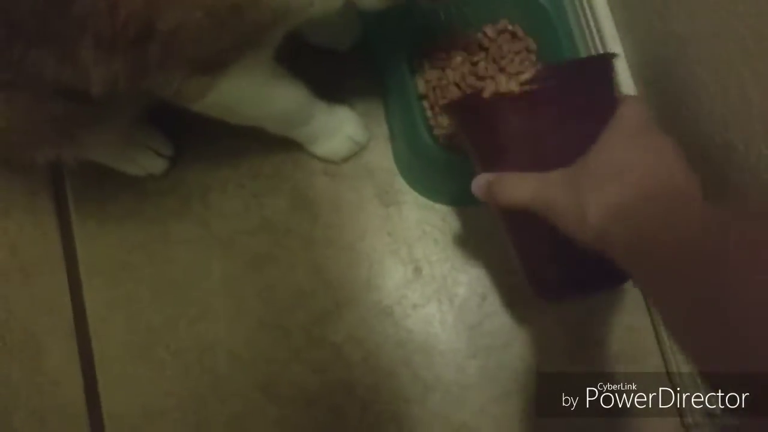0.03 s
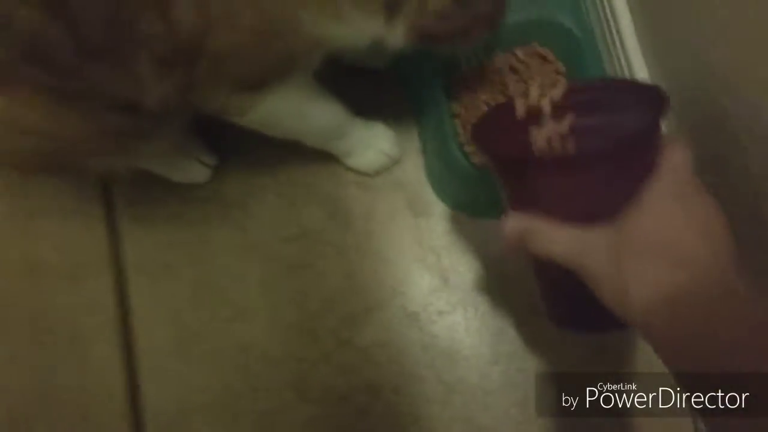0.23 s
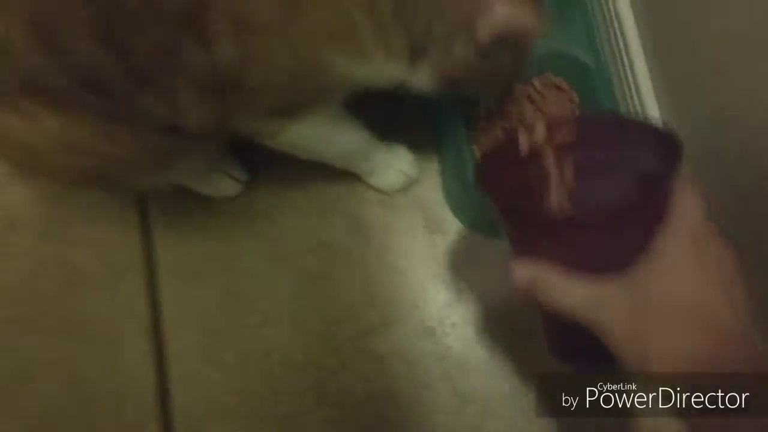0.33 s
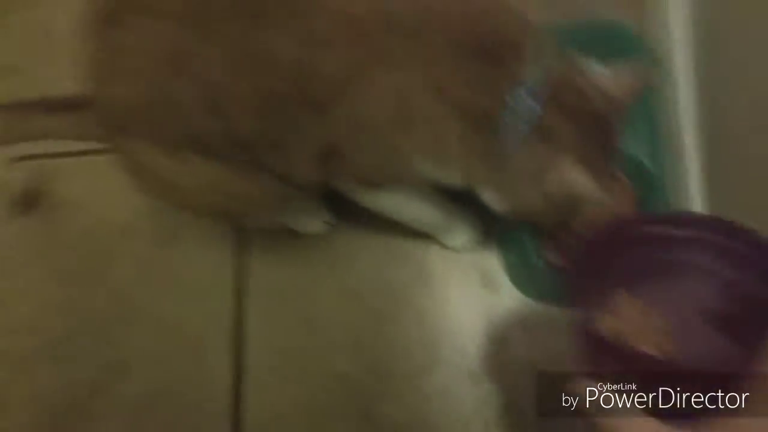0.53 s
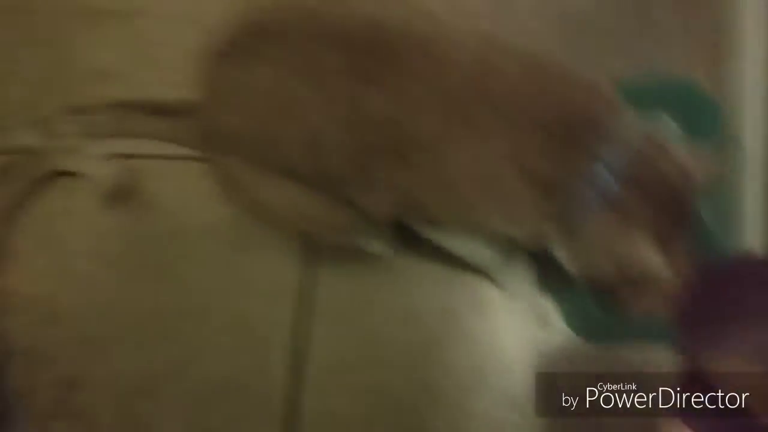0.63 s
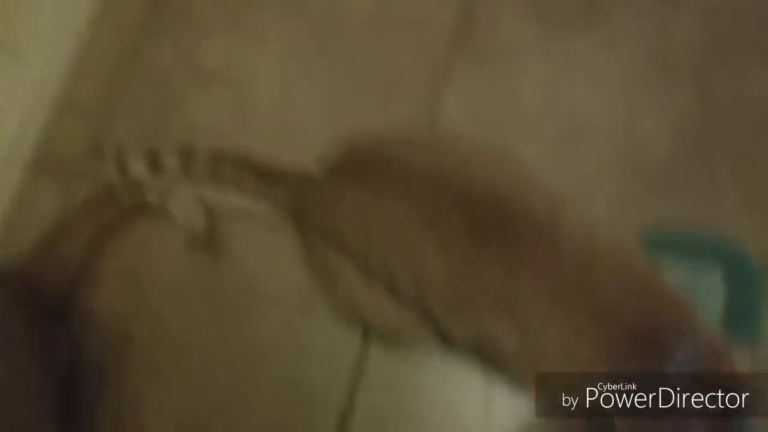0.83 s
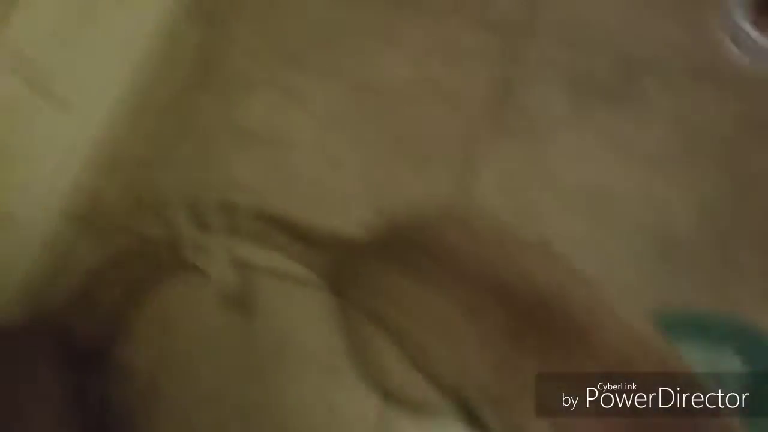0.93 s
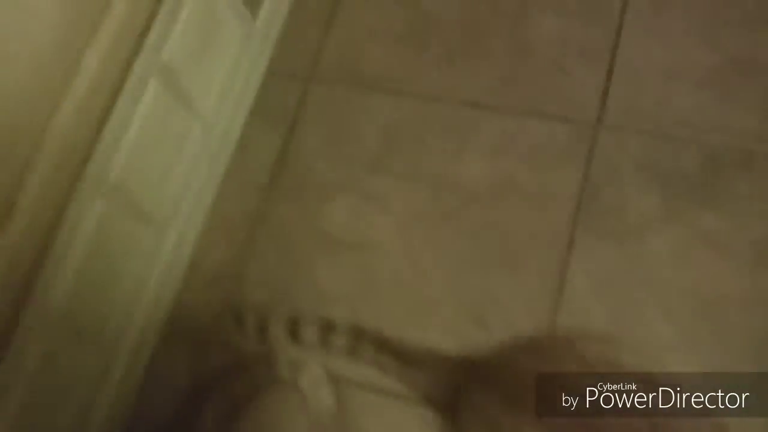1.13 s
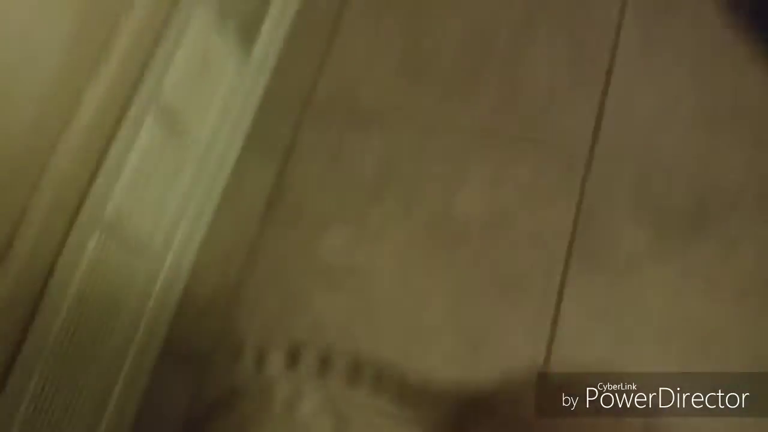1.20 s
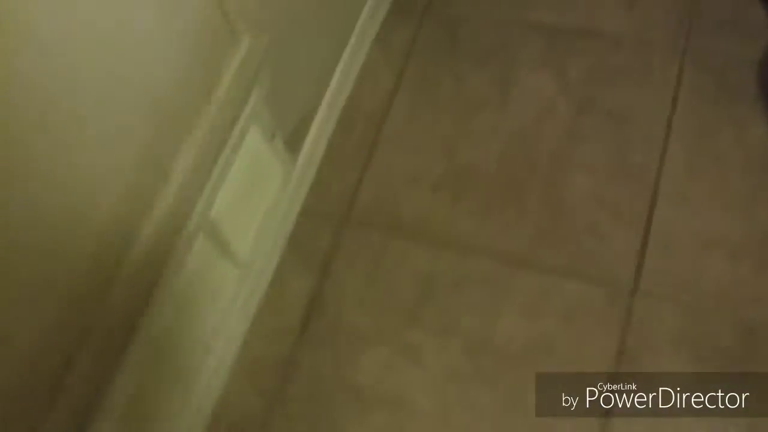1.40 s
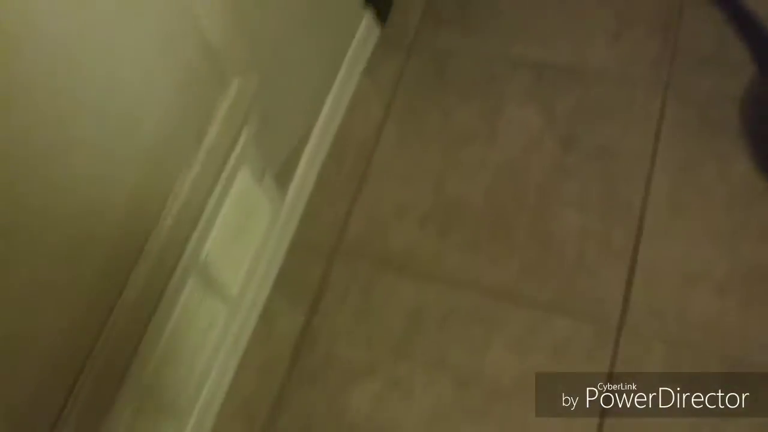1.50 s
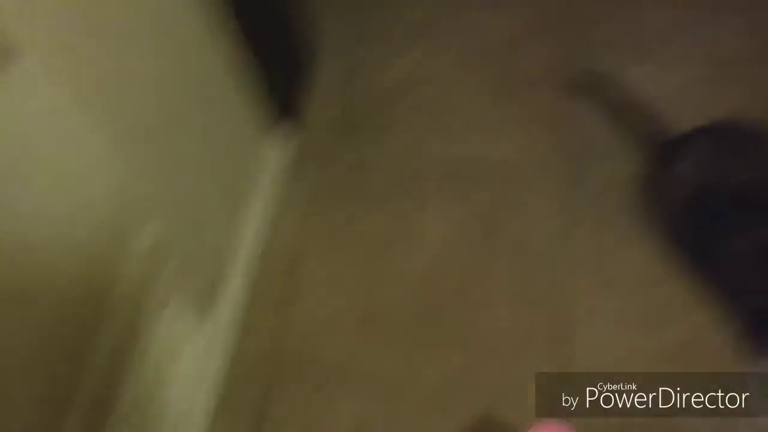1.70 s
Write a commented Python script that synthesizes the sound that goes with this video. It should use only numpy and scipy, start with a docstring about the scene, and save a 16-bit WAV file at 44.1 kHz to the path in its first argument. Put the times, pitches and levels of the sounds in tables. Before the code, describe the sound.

Dry kibble rattles in a plastic cup, with light knocks growing into sharp clacks, then a short metallic clink and a gritty foot scuff on tile. Close small microphone, short bright room echo, faint background noise.

```python
"""Pellets tumbling in a plastic cup

Dry pellets slide and tumble inside a plastic cup after pouring, in a small tiled room.
Each knock is a click that rings the cup's hollow, its wall and the pellet itself, all fading sines.
Metal clinks are longer rings and pings are single sines; thin ticks and a foot's scuff are shaped noise.
Low bumps of hand and cup ring softly, and a dying noise echo and quiet background noise surround it all."""
import sys
import numpy as np
from scipy import signal
from scipy.fft import rfft, irfft
from scipy.io import wavfile
from scipy.ndimage import uniform_filter1d

SR = 44100
rng = np.random.default_rng(int(sys.argv[2]) if len(sys.argv) > 2 else 0)


def store_wav(level_fs):
    """Save 16-bit WAV to argv[1]."""
    pcm = np.round(np.clip(np.atleast_2d(level_fs), -1, 1) * 32767)
    wavfile.write(sys.argv[1], SR, pcm.T.astype(np.int16))


def invert_db(level):
    """Linear amplitude ratio for a level in decibels (20 dB per decade), elementwise."""
    return 10 ** (np.asarray(level, dtype=float) / 20)


N = 77175   # length in samples

# ringing tones of the air in the cup, the cup wall and a pellet, before each spot shifts them:
# columns pitch_hz, level_db (relative), fade_s (time to fall by 60 dB)
HOLLOW_MODES = [(395, -17, 0.02), (589.6, -7.5, 0.038), (673, -4, 0.045), (782.2, 2.5, 0.045),
                (983, -9, 0.036)]
WALL_MODES = [(1215, -7, 0.0093), (1458, -13.5, 0.03), (1670, -9, 0.028), (2006, -2.5, 0.011),
              (2378, -1.5, 0.0091), (2821, -3.5, 0.01), (3248, -3, 0.014)]
PELLET_MODES = [(3950, -1, 0.0058), (4500, -5, 0.013), (5140, -1.5, 0.013), (6020, -0.5, 0.0068),
                (6193, 4.5, 0.003)]
HOLLOW_RISE_S, WALL_RISE_S, PELLET_RISE_S = 0.002, 0.00095, 0.00034   # how slowly each swells in
HOLLOW_DETUNE, DETUNE = 0.024, 0.045   # typical pitch shift from spot to spot, as a share of the pitch


def rms_one(x):
    """Scale to an average strength (rms) of 1."""
    return x / np.sqrt(np.mean(x ** 2) + 1e-20)


def in_time(rows):
    """Turn a table of time and levels into smooth curves, one value per sample."""
    time_s, *columns = np.transpose(rows)
    return [np.interp(np.arange(N) / SR, time_s, column, right=-120) for column in columns]


def white_noise():
    """Noise with equal strength at all pitches."""
    return rng.standard_normal(N)


def low_pass(x, hz):
    """Keep what lies below hz, with a steep edge."""
    return signal.sosfilt(signal.butter(8, hz, fs=SR, output="sos"), x)


def high_pass(x, hz, order):
    """Keep what lies above hz; a higher order gives a steeper edge."""
    return signal.sosfilt(signal.butter(order, hz, "high", fs=SR, output="sos"), x)


def clicks(start_s, gains):
    """Single-sample clicks at given times."""
    return np.bincount((np.asarray(start_s) * SR).astype(int), gains, N)[:N]


def ring(x, hz, fade_s, rise_s):
    """A click sets a sine ringing; a second, wider resonance lets it swell in."""
    turn = 2 * np.pi * hz / SR
    fade = invert_db(-60 / (fade_s * SR))
    rise = np.exp(-1 / (rise_s * SR))
    # the tiny offset keeps the filters away from extremely small numbers
    swell = signal.lfilter([1 - rise, 0, rise - 1], [1, -2 * rise * np.cos(turn), rise ** 2], x + 1e-18)
    return signal.lfilter([0, np.sin(turn)], [1, -2 * fade * np.cos(turn), fade ** 2], swell)


def strike(modes, start_s, db, rise_s, detune, spots=7):
    """Blows take turns on several spots, each with shifted modes; mode strength and sign vary per blow."""
    spread_db = 3
    chance = rng.standard_normal((len(start_s), 2, len(modes)))
    spot = np.arange(len(start_s)) % spots
    shift = 1 + detune * rng.standard_normal((spots, len(modes)))
    out = 0
    for k, (hz, level_db, fade_s) in enumerate(modes):
        gains = invert_db(db + level_db + spread_db * chance[:, 0, k]) * np.sign(chance[:, 1, k])
        for j in range(spots):
            here = clicks(start_s[spot == j], gains[spot == j])
            out = out + ring(here, hz * shift[j, k], fade_s, rise_s)
    return out


def coloured(points):
    """Noise whose strength at each pitch follows a table, scaled to rms 1."""
    hz, db = np.transpose(points)
    pitch_hz = np.arange(N // 2 + 1) * SR / N + 1   # the 1 avoids the logarithm of zero
    gain = invert_db(np.interp(np.log(pitch_hz), np.log(hz), db))
    return rms_one(irfft(rfft(white_noise()) * gain, N))


def bursts(start_s, db, fade_s, low_hz):
    """Puffs of noise above low_hz that start at once and die away."""
    fade = invert_db(-60 / (fade_s * SR))
    shape = signal.lfilter([1], [1, -fade], clicks(start_s, invert_db(db)) + 1e-18)
    return shape * high_pass(white_noise(), low_hz, order=4)


def background():
    """Steady quiet noise with its own balance of low and high."""
    # colour of the background: pitch_hz, level_db (per Hz, relative)
    background_colour = [(12, -40.5), (20, -3.5), (144, -4), (282, -9), (427, -5), (1070, -11.5),
                         (3350, -16.5), (6360, -14.5), (10500, -28), (15500, -17.5)]
    return invert_db(-67) * coloured(background_colour)


def tumble():
    """Many small contacts at random times ring the cup, with a thin hiss of sliding on top."""
    # strength of the tumbling between knocks: time_s, hollow_db, wall_db, pellet_db (rms)
    tumble_levels = [(0, -40.5, -52, -50), (.07, -56.5, -60, -54.5), (.2, -65, -61.5, -57.5),
                     (.3, -59.5, -53, -47), (.47, -53, -52, -50.5), (.51, -61, -68, -56),
                     (.58, -53.5, -46.5, -47.5), (.7, -51, -53.5, -50), (.8, -48.5, -45.5, -51),
                     (.88, -59.5, -59.5, -66), (.94, -72.5, -77, -69), (1.05, -60, -61.5, -78),
                     (1.16, -90, -78, -65)]
    contacts_per_s, length_s = 1100, 1.17
    size_spread_db, clump_db = 2.2, 3.5
    colour_db = 3.0   # how unevenly a small contact shares out to hollow, wall and pellet
    hiss_db, hiss_follows = -72, 0.43   # hiss at a pellet level of -50 dB; share of that level's swing

    start_s = rng.random(int(contacts_per_s * length_s)) * length_s
    size_db = size_spread_db * np.minimum(rng.exponential(1, len(start_s)), 3.5)
    # contacts close in time grow stronger or weaker together
    size_db = size_db + clump_db * np.interp(start_s, np.arange(80) / 60, rng.standard_normal(80))

    hollow_db, wall_db, pellet_db = in_time(tumble_levels)
    parts = [(hollow_db, HOLLOW_MODES, HOLLOW_RISE_S, HOLLOW_DETUNE),
             (wall_db, WALL_MODES, WALL_RISE_S, DETUNE),
             (pellet_db, PELLET_MODES, PELLET_RISE_S, DETUNE)]
    out = 0
    for level_db, modes, rise_s, detune in parts:
        blow_db = size_db + colour_db * rng.standard_normal(len(start_s))
        out = out + invert_db(level_db) * rms_one(strike(modes, start_s, blow_db, rise_s, detune))
    hiss = rms_one(high_pass(white_noise(), 7200, order=6))
    return out + invert_db(hiss_db + hiss_follows * (pellet_db + 50)) * hiss


def knocks():
    """Single pellets hit the cup; the wall also rings at a pitch set by where it is hit."""
    # pellet knocks: start_s (before a fixed delay), click_db, hollow_db and wall_db (relative to
    # the click), wall_pitch_hz
    knock_table = [(0.0044, -39, -11, 0, 1410), (0.0338, -35, -15.5, -6.5, 1380),
                   (0.0682, -37.5, -18.5, -9, 1320), (0.0922, -35, -3.5, 5.5, 1415),
                   (0.1476, -34, -26, -9, 2180), (0.2882, -26.5, -18, -7, 2090),
                   (0.3687, -23.5, -27, -8.5, 2700), (0.4274, -37.5, -1.5, 1, 2420),
                   (0.4684, -36, -7, 0, 1450), (0.5072, -45, 0, 4, 950), (0.5368, -21.5, -26, -12, 3230),
                   (0.5664, -34, 1, -2, 1540), (0.5934, -30, -9.5, -8.5, 2980),
                   (0.577, -34.5, -15.5, 0.5, 3200), (0.607, -27, -29, -12.5, 2960),
                   (0.6605, -29.5, -26, -12, 4500), (0.6664, -43, 7, 10, 3420),
                   (0.680, -32.5, -25.5, -15, 2550), (0.7522, -8.5, -32.5, -17.5, 2830),
                   (0.7784, -40, -1, 2, 960), (0.7951, -14, -14, -10, 2926), (0.8195, -28.5, -17, -6, 3410),
                   (0.838, -25, -6.5, -3.5, 1640), (0.8675, -30, -33, -8, 1610),
                   (0.8884, -34.5, -16.5, -24, 1600), (0.9627, -19, -12.5, -8, 3493),
                   (1.0287, -28.5, -14, -3, 1865), (1.0904, -38.5, -46, -30, 3080),
                   (1.4608, -62, 5.5, 4.5, 875), (1.5794, -55, -3, -12.5, 840), (1.6134, -58, 2.5, 5, 1790),
                   (1.6771, -63, -6, 9.5, 2864)]
    start_s, db, hollow_db, wall_db, wall_hz = np.transpose(knock_table)
    start_s = start_s + 0.001009   # every knock sounds about 1 ms after its listed time
    hollow = strike(HOLLOW_MODES, start_s, db + hollow_db, HOLLOW_RISE_S, HOLLOW_DETUNE)
    wall = strike(WALL_MODES, start_s, db + wall_db, WALL_RISE_S, DETUNE)
    for s, level_db, hz in zip(start_s, db + wall_db + 5.5, wall_hz):
        wall = wall + ring(clicks([s], [invert_db(level_db)]), hz, 0.011, WALL_RISE_S)

    # a pellet rolls over and touches again within 1.8 ms
    roll_s = 0.0018 * rng.random(len(start_s))
    pellet = strike(PELLET_MODES, start_s + roll_s, db - 5.5, PELLET_RISE_S, DETUNE)
    # the hard edge of each knock
    snap = ring(clicks(start_s, invert_db(db + 3)), 5886, 0.0022, PELLET_RISE_S)
    treble = bursts(start_s, db - 35, 0.014, low_hz=7540)
    # neighbours shaken loose by a knock
    rattle = low_pass(bursts(start_s + 0.0035, db - 17.5, 0.07, low_hz=2600), 6900)
    return hollow + wall + pellet + snap + treble + rattle


def ticks():
    """Thin bright ticks, each a short puff of high noise."""
    # ticks: start_s, level_db, fade_s, lowest_hz
    tick_table = [(.008, -47.5, 0.017, 8800), (.36, -44, 0.024, 7000), (0.3688, -42, 0.015, 6800),
                  (0.469, -53, 0.016, 7000), (0.7265, -42, 0.057, 5270), (1.286, -51, .04, 5000),
                  (1.499, -59, 0.021, 4500)]
    return sum(bursts([s], [db], fade_s, low_hz) for s, db, fade_s, low_hz in tick_table)


def bumps():
    """Soft low bumps of hand and cup, each a low ring set off by four loose nudges."""
    # bumps: start_s, pitch_hz, level_db, fade_s
    bump_table = [(.02, 323, -51, 0.035), (0.36, 137, -61, 0.11), (0.36, 320, -46, 0.03),
                  (0.458, 332, -55, 0.069), (0.779, 99.5, -63.5, 0.37), (1.672, 99.4, -64.5, 0.14)]
    out = 0
    for s, hz, db, fade_s in bump_table:
        nudge_s = s + 0.015 * rng.random(4)
        pushes = invert_db(db) * np.array([1, -1, 1, -1])   # two pushes each way, in random order
        out = out + ring(clicks(nudge_s, pushes), hz, fade_s, rise_s=0.00037)
    return out


def clinks():
    """Metal rings with clean modes that a touch soon damps; noise and clatter join each blow."""
    # blows on metal: start_s, level_db
    bright_clinks = [(.2368, -30.5)]
    long_clinks = [(1.1778, -34.5)]
    # ringing tones of the metal: pitch_hz, level_db (relative), fade_s (before the damping)
    bright_metal = [(1420, -11, 0.034), (2116, -15, 0.096), (3380, -10, 0.032), (4320, -8, 0.082),
                    (5620, 5, 0.026), (7140, 4, 0.025), (9012, -10.5, 0.033), (12200, -29, 0.034),
                    (13490, -6, 0.011)]
    long_metal = [(417.4, -29, 0.2), (1444, -18.5, 0.22), (1610, -38, 0.13), (2060, -18, 0.14),
                  (2350, -6, 0.17), (3140, -8, 0.28), (3420, -7, 0.22), (4900, -31, 0.098),
                  (5810, -0.5, 0.1), (6260, -6.5, 0.13), (6900, -1, 0.021), (7580, -16.5, 0.17),
                  (9510, -22, 0.18), (12500, -26, .06), (13630, -14, 0.051)]
    damped_after_s, damping_db_per_s = 0.07, 400
    twin_split, twin_db = 0.012, -7   # each mode has a close, weaker twin and beats with it

    out = 0
    for blows, modes in ((bright_clinks, bright_metal), (long_clinks, long_metal)):
        twins = [(hz * (1 + twin_split), level_db + twin_db, fade_s) for hz, level_db, fade_s in modes]
        for s, db in blows:
            damped_s = np.maximum(np.arange(N) / SR - s - damped_after_s, 0)
            tone = sum(ring(clicks([s], [invert_db(db + level_db)]), hz, fade_s, rise_s=0.0016)
                       for hz, level_db, fade_s in [*modes, *twins])
            noise = bursts([s], [db - 3], 0.027, low_hz=7000)
            clatter = low_pass(bursts([s], [db - 9], 0.19, low_hz=820), 7000)
            out = out + invert_db(-damping_db_per_s * damped_s) * tone + noise + clatter
    return out


def pings():
    """Short fading sines: tag-like tinkles near 11 kHz, and brief clicks and a ring at 4 to 7 kHz."""
    # pings: start_s, pitch_hz, level_db, fade_s
    ping_table = [(0.345, 10900, -52, .02), (.40, 10600, -52, 0.028), (.7262, 6600, -21, 0.007),
                  (0.731, 4160, -40.5, 0.095), (1.286, 11100, -46, 0.041), (1.0575, 6470, -43, 0.0049),
                  (1.064, 6340, -36, 0.0066)]
    return sum(ring(clicks([s], [invert_db(db)]), hz, fade_s, rise_s=0.00096) for s, hz, db, fade_s in ping_table)


def scuff():
    """A foot's gritty slide over the tiles: coloured noise whose level trembles quickly."""
    # strength of the slide: time_s, level_db
    scuff_levels = [(1.2, -66), (1.245, -57), (1.263, -47.5), (1.28, -57), (1.291, -49), (1.311, -54.5),
                    (1.327, -49), (1.355, -46.5), (1.375, -62), (1.42, -71.5), (1.45, -101)]
    # colour of the slide: pitch_hz, level_db (per Hz, relative)
    scuff_colour = [(300, -65), (431, -16), (835, -19), (1420, -12), (5300, -8), (6050, -2.5),
                    (7500, -20.5), (15500, -32.5)]
    db, = in_time(scuff_levels)
    grain_db = 1.5 * rms_one(uniform_filter1d(white_noise(), size=120))
    started = np.arange(N) / SR > scuff_levels[0][0]
    return invert_db(db + grain_db) * coloured(scuff_colour) * started


def room(x):
    """Dense echo of the tiled room: dying noise serves as the pattern of reflections."""
    t60_s, level_db = 0.18, -7
    t = np.arange(SR // 2) / SR
    tail = rng.standard_normal(len(t)) * invert_db(-60 * t / t60_s)
    tail = tail * np.clip(t / 0.0014, 0, 1)   # the echo builds up over 1.4 ms
    return invert_db(level_db) * signal.fftconvolve(x, tail / np.sqrt(np.sum(tail ** 2)))[:N]


def scene():
    """All sources and their echo in the room, over quiet background noise."""
    thin_knocks = high_pass(knocks(), 480, order=2)   # the light cup gives little bass
    near = tumble() + thin_knocks + ticks() + bumps() + clinks() + pings() + scuff()
    return (near + room(near) + background())[None]


def band_limit(x):
    """A steep low-pass at the top of the band."""
    return signal.sosfilt(signal.butter(12, 16410, fs=SR, output="sos"), x)


def record(dry):
    """The small microphone resonates and lifts the lower treble; then the top is cut off."""
    peak_hz, peak_width_hz, peak_gain = 6430, 580, 0.44
    fade = np.exp(-np.pi * peak_width_hz / SR)
    turn = 2 * np.pi * peak_hz / SR
    peak = signal.lfilter([(1 - fade ** 2) / 2, 0, (fade ** 2 - 1) / 2],
                          [1, -2 * fade * np.cos(turn), fade ** 2], dry)
    top_cut = signal.cheby2(12, 30, 15500, fs=SR, output="sos")   # 30 dB down from 15500 Hz up
    finished = signal.sosfilt(top_cut, dry + peak_gain * peak)
    return band_limit(finished)


dry = scene()
out = record(dry)
store_wav(out)
```